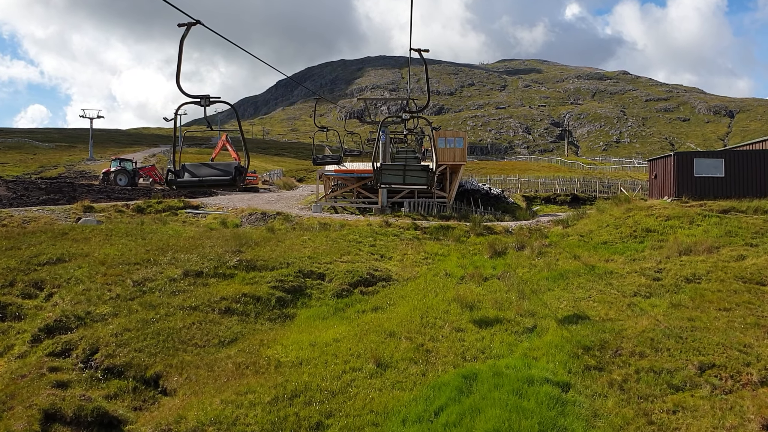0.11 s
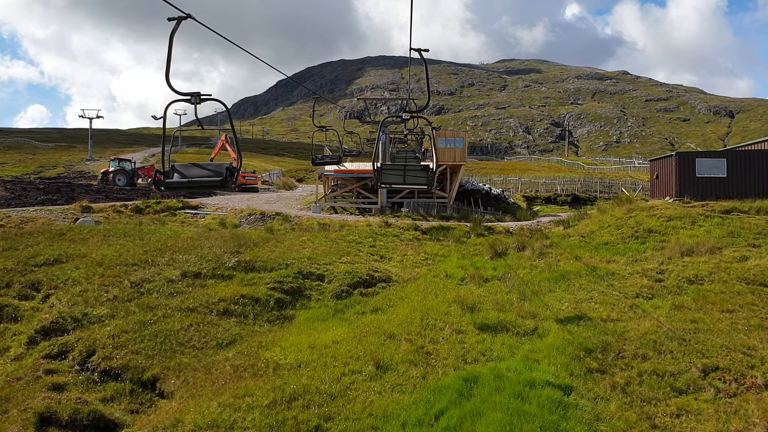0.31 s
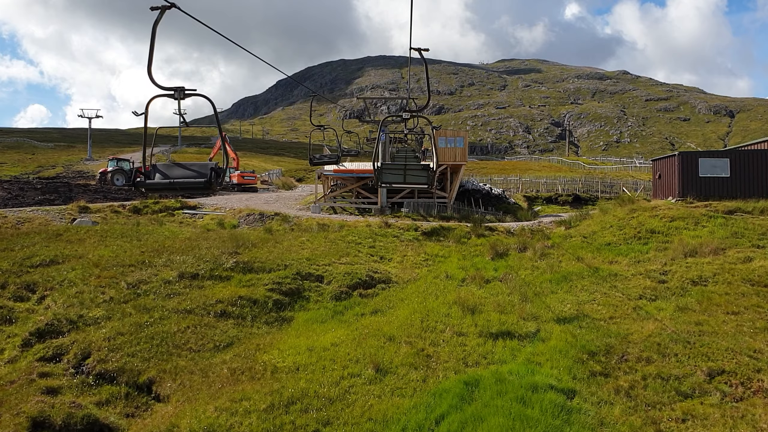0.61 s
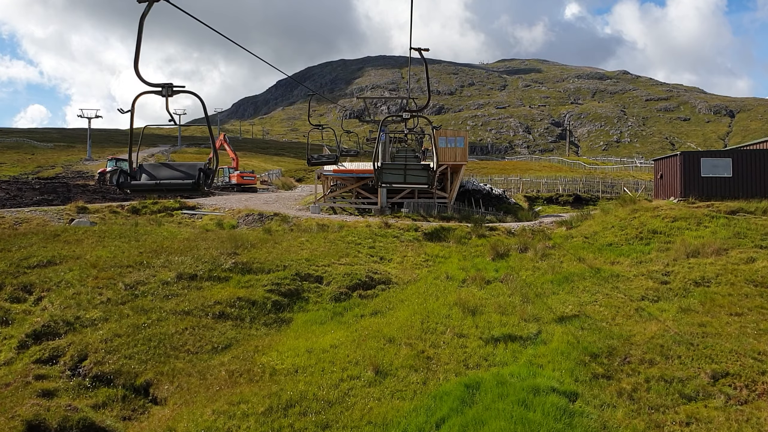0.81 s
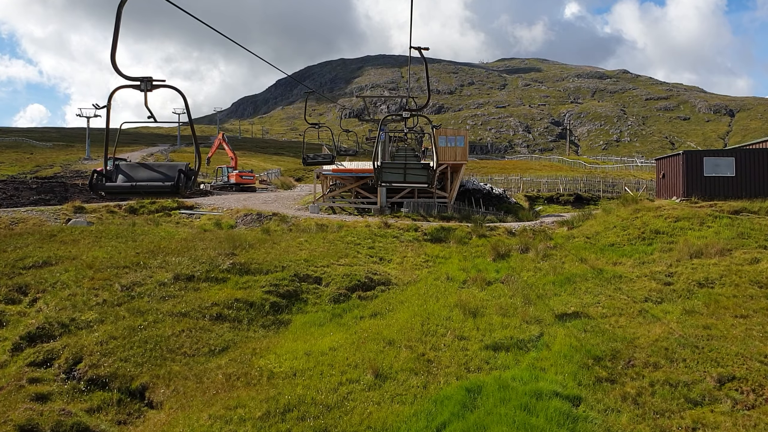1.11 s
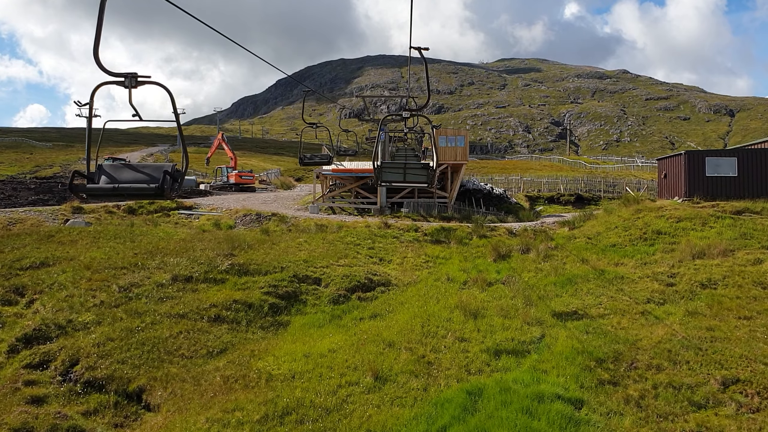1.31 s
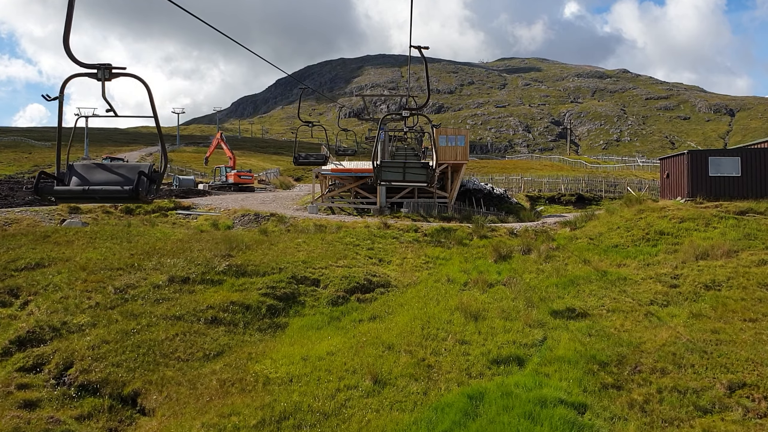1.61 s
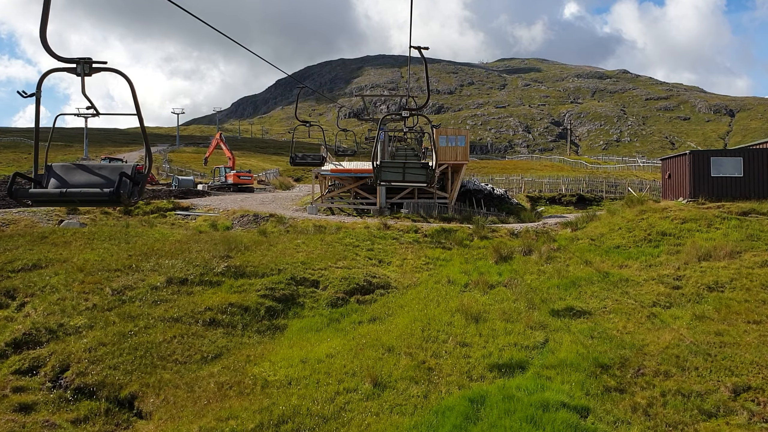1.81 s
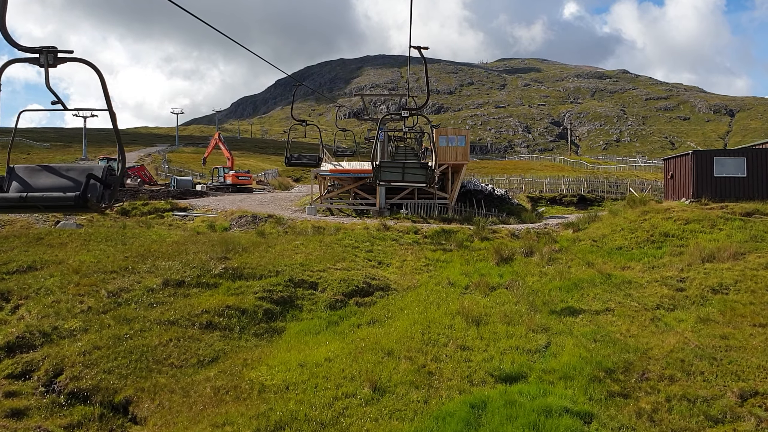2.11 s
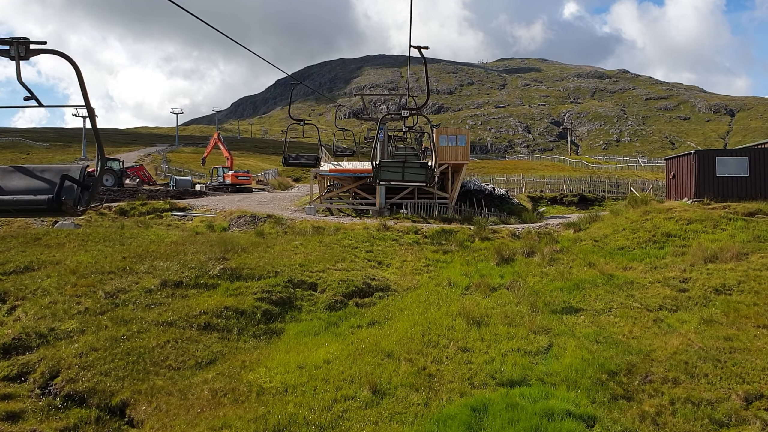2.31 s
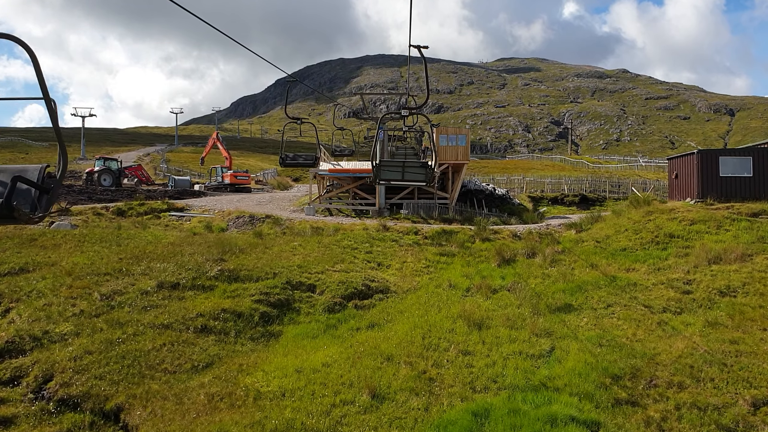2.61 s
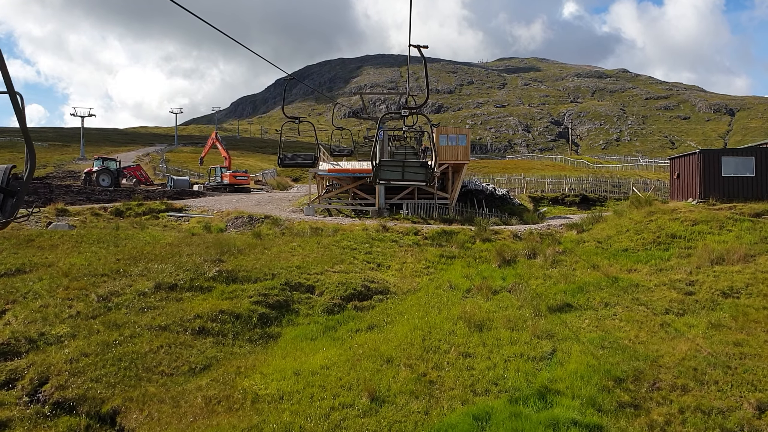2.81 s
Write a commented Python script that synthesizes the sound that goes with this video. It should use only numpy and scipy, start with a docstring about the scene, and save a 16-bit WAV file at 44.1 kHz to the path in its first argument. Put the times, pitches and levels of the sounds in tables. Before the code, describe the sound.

Wind gusts thump on the microphone over a distant diesel engine and faint chairlift hiss.

```python
"""Open hillside by a running chairlift. A distant diesel engine is a periodic source: its harmonics
make a steady low hum, and the knocks of its four cylinders a fast, uneven clatter. Friction of the haul
rope on its sheaves gives a slowly growing hiss, a faint singing and one brief scrape. Gusts strike the
microphone, nearly all on its right port; their turbulent pressure is heard as rumble and dull thumps,
with a faint, high rustle."""
import sys
import numpy as np
from scipy.fft import rfft, irfft, next_fast_len
from scipy.io import wavfile
from scipy.ndimage import map_coordinates

SR = 44100
rng = np.random.default_rng(int(sys.argv[2]) if len(sys.argv) > 2 else 0)


def int16_out(signal):
    """Quantize to a 16-bit WAV file."""
    q = np.round(np.clip(np.atleast_2d(signal).T, -1, 1) * 32767)
    wavfile.write(sys.argv[1], SR, q.astype(np.int16))


N = 130095
TIME = np.arange(N) / SR
FFT_SIZE = next_fast_len(N + 8192)
CYCLE_HZ = 15.17  # engine cycles a second
LEAD_S = 0.000093  # the left port hears the machinery first

# Harmonics of the engine (multiple of the cycle rate, left level [dB], right level [dB])
ENGINE_HARMONICS = [(3, -68, -59), (4, -58, -52), (6, -65, -57), (8, -56, -52), (14, -65, -60),
                    (18, -71, -67), (20, -72, -67), (21, -72, -66), (24, -70, -63), (28, -83, -73),
                    (36, -86, -77), (41, -83, -78), (49, -76, -74), (54, -76, -76), (59, -79, -75),
                    (72, -85, -78), (76, -87, -80), (105, -84, -83), (111, -90, -83), (123, -87, -84),
                    (158, -87, -87), (168, -89, -82), (172, -93, -86), (216, -96, -92)]
# Knocks of the four cylinders (place in the cycle [0-1], relative level [dB])
CYLINDER_KNOCKS = [(.08, -7), (.35, 0), (.555, -3), (.785, 1)]
# Part of the machinery's noise that comes in knocks (frequency [Hz], share of power [0-1])
KNOCK_SHARE = [(150, 0.14), (400, 0.47), (800, 0.63), (1800, 0.25), (3000, 0.1), (6000, 0.11), (10000, .03)]
# Likeness of that noise at the two ports (frequency [Hz], correlation [0-1])
PORT_CORRELATION = [(60, 0.93), (350, 0.96), (800, 0.76), (1500, 0), (2200, 0), (4200, 0.36), (7000, 0.1),
                    (10000, 0)]
# Its spectrum before the band gains (frequency [Hz], left density [dB/Hz], right density [dB/Hz])
MACHINERY_SPECTRUM = [(19.5, -89, -66), (38, -67, -67), (68.4, -66, -67.5), (122, -72, -68),
                      (224, -76, -75.5), (365, -85, -79.5), (467, -97, -91), (688, -92, -89),
                      (731, -82, -81.5), (910, -88, -86), (1116, -96, -87.5), (1273, -100, -100),
                      (1416, -99, -100), (1510, -91.5, -94), (1763, -100, -90.5), (1760, -92.5, -87),
                      (2193, -105, -102), (2470, -99, -92.5), (2570, -107, -94.5), (3080, -107, -106),
                      (3670, -111, -102), (3680, -112, -111), (4140, -111, -112), (4230, -111, -106),
                      (5050, -110, -110), (5700, -111, -110), (6700, -110, -108), (6850, -111, -114),
                      (7680, -112, -123), (8170, -121, -122), (9400, -122, -121), (11600, -118, -118),
                      (15500, -119, -119)]
# Gains of its two bands (time [s], clatter gain [dB], hiss gain [dB])
BAND_GAINS = [(0, -5, -2.5), (.45, -3.5, -2), (.62, -2.3, -1.8), (1, -2, 1), (1.35, -1, 0.5),
              (2.05, 0.5, -1.5), (2.4, 0, 3.1), (2.95, 2, 4)]
# Bands in which those gains act (frequency [Hz], weight [0-1])
CLATTER_WEIGHTS = [(300, 0.15), (900, 0.24), (2500, 0.85), (4500, 0)]
HISS_WEIGHTS = [(2500, 0), (4500, 0.83), (8000, 1), (11000, .1)]
# Resonances of the rope's singing and scrape (frequency [Hz], bandwidth [Hz], relative level [dB])
SINGING_MODES = [(5470, 55, -17.5), (6455, 190, -12)]
SCRAPE_MODES = [(4480, 140, -2), (1920, 510, 0)]
# Envelope of the singing on the right port (time [s], level [dB])
SINGING_ENVELOPE = [(0, -86), (.5, -83), (.7, -79), (1.05, -75), (1.45, -82), (1.9, -76), (2.5, -73),
                    (2.95, -76.5)]
# Spectrum of the wind's rumble (frequency [Hz], relative level [dB])
RUMBLE_SPECTRUM = [(15, -32.5), (35, 5), (62, 11), (100, -5), (200, -19.5), (400, -24), (900, -56),
                   (3000, -100)]
# Envelope of the rumble (time [s], left level [dB], right level [dB])
GUST_ENVELOPE = [(0, -66, -46), (.28, -79, -53), (.57, -60, -52), (.68, -62, -32.5), (.83, -56, -44),
                 (.93, -46, -29), (1.13, -64, -42.5), (1.27, -65, -33), (1.42, -53, -35), (1.48, -38, -42),
                 (1.57, -51, -39.5), (1.67, -49, -34), (1.85, -61, -58.5), (2.0, -61, -26),
                 (2.24, -63, -45), (2.37, -44, -29.5), (2.47, -50, -50), (2.95, -68, -86)]
# Eddies at the right port (time [s], envelope peak [dB], starting frequency [Hz], rise time [s])
EDDY_IMPACTS = [(0.609, -27, 139, 0.0037), (0.656, -24.5, 256, 0.0029), (0.715, -28, 60, 0.0099),
                (.9, -24.5, 70.4, .006), (0.926, -28, 79.5, 0.0038), (.988, -22.5, 182, 0.0025),
                (1.03, -29, 254, 0.005), (1.099, -27.5, 134, 0.0029), (1.184, -19, 210, 0.0049),
                (1.331, -20.5, 244, 0.014), (1.411, -22.5, 313, 0.0037), (1.66, -26, 228, 0.0033),
                (1.679, -22.5, 220, 0.0037), (1.748, -26.5, 98, 0.0039), (1.972, -16, 291, 0.0061),
                (2.007, -22.5, 180, 0.0081), (2.134, -20, 72, 0.0058), (2.234, -20.5, 235, 0.0021),
                (2.322, -23, 196, 0.0032)]
# Spectrum of the rustle (frequency [Hz], relative level [dB])
RUSTLE_SPECTRUM = [(3000, -30), (8000, -9), (12000, 0), (16000, -7)]
# Swells of the rustle (time [s], level [dB])
RUSTLE_SWELLS = [(.645, -81), (.99, -87), (1.35, -83), (2.0, -86)]


def amp(db):
    """Amplitude ratio: tenfold for every 20 dB."""
    return 10 ** (np.asarray(db) / 20)


def unit_rms(x):
    """Normalisation to unit mean power."""
    return x / np.sqrt(np.mean(x ** 2) + 1e-20)


def bell(offset, sigma):
    """Gaussian window of height 1."""
    return np.exp(-.5 * (offset / sigma) ** 2)


def at_hz(table, hz, column=1):
    """Interpolation of one column on a logarithmic frequency axis."""
    columns = np.transpose(table)
    return np.interp(np.log(hz + 1), np.log(columns[0] + 1), columns[column])


def envelopes(table):
    """Linear interpolation in time of each column after the first."""
    times, *columns = np.transpose(table)
    return np.array([np.interp(TIME, times, column) for column in columns])


def wobble(rate):
    """Slow random modulation: a spline through `rate` random values a second."""
    return map_coordinates(rng.standard_normal(512), [TIME * rate], mode="wrap")


def white_noise():
    """Flat-spectrum noise, uncorrelated between the two ports."""
    return rng.standard_normal((2, N))


def filtered(x, response):
    """Linear filtering: the spectrum is multiplied by a frequency response."""
    hz = np.fft.rfftfreq(FFT_SIZE, 1 / SR)
    return irfft(rfft(x, FFT_SIZE) * response(hz), FFT_SIZE)[..., :N]


def engine_cycles(wander=.0016):
    """Phase, in cycles, is the integral of the engine's slightly wandering speed."""
    return np.cumsum(CYCLE_HZ * (1 + wander * wobble(4))) / SR


def engine_hum(cycles, waver_db=3.0):
    """A periodic source radiates harmonics of its cycle rate; each wavers in level."""
    at_ports = cycles + CYCLE_HZ * np.array([[LEAD_S], [0]])
    out = np.zeros((2, N))
    for order, left_db, right_db in ENGINE_HARMONICS:
        phase = order * at_ports + rng.random()
        rms = amp([[left_db], [right_db]]) * amp(waver_db * wobble(5.19))
        out += rms * np.sqrt(2) * np.sin(2 * np.pi * phase)
    return out


def cylinder_knocks(cycles, width_cycles=.037, bed_db=-3.5, repeating_share=.66):
    """Amplitude modulation: each cylinder gates a burst of noise that partly repeats every cycle."""
    size = int(SR / CYCLE_HZ)
    one_cycle = unit_rms(irfft(np.exp(2j * np.pi * rng.random((2, size // 2 + 1))), size))
    repeating = np.array([map_coordinates(row, [cycles % 1 * size], mode="wrap") for row in one_cycle])
    noise = np.sqrt(repeating_share) * repeating + np.sqrt(1 - repeating_share) * white_noise()
    gate = amp(bed_db)
    for place, db in CYLINDER_KNOCKS:
        offset = (cycles - place + .5) % 1 - .5
        gate += amp(db) * bell(offset, width_cycles)
    return unit_rms(gate * noise)


def machinery_at_ports(pair):
    """Partial coherence: two noises mix into the ports, each port with its own colour and timing."""
    angle = lambda hz: np.arccos(at_hz(PORT_CORRELATION, hz)) / 2
    mid, side = filtered(pair, lambda hz: np.array([np.cos(angle(hz)), np.sin(angle(hz))]))
    colour = lambda hz, column: amp(at_hz(MACHINERY_SPECTRUM, hz, column))
    left = filtered(mid + side, lambda hz: colour(hz, 1) * np.exp(2j * np.pi * hz * LEAD_S))
    right = filtered(mid - side, lambda hz: colour(hz, 2))
    return np.sqrt(SR / 2) * np.array([left, right])


def clatter_and_hiss(cycles):
    """Incoherent sources add in power: engine knocks and the smooth rush of rope over sheaves."""
    knocks = filtered(cylinder_knocks(cycles), lambda hz: np.sqrt(at_hz(KNOCK_SHARE, hz)))
    rush = filtered(white_noise(), lambda hz: np.sqrt(1 - at_hz(KNOCK_SHARE, hz)))
    sound = machinery_at_ports(knocks + rush)
    clatter = filtered(sound, lambda hz: at_hz(CLATTER_WEIGHTS, hz))
    hiss = filtered(sound, lambda hz: at_hz(HISS_WEIGHTS, hz))
    clatter_db, hiss_db = envelopes(BAND_GAINS)
    hiss_db += 0.62 * wobble(10)
    return sound + (amp(clatter_db) - 1) * clatter + (amp(hiss_db) - 1) * hiss


def rope_resonance(modes, left_db=-17):
    """Forced resonance: friction noise drives narrow modes, heard mostly on the right port."""
    def response(hz):
        """Superposition of second-order resonances with steepened skirts."""
        total = 0
        for centre, width, db in modes:
            peak = 1j * hz * width / (centre ** 2 - hz ** 2 + 1j * hz * width)
            skirts = np.sqrt(1 + ((hz - centre) / (2 * width)) ** 2)
            total += amp(db) * peak / np.sqrt(width) / skirts
        return total
    return amp([[left_db], [0]]) * unit_rms(filtered(white_noise(), response))


def rope_singing(waver_db=1.2):
    """Sustained friction keeps two high resonances of the running rope sounding faintly."""
    level_db = envelopes(SINGING_ENVELOPE) + waver_db * wobble(7.9)
    return amp(level_db) * rope_resonance(SINGING_MODES)


def wind_rumble(flutter_db=5.5):
    """Turbulence makes low-frequency pressure fluctuations, uncorrelated between the ports."""
    noise = filtered(white_noise(), lambda hz: amp(at_hz(RUMBLE_SPECTRUM, hz)))
    flutter = amp(flutter_db * np.tanh([wobble(23), wobble(29.59)]))
    return amp(envelopes(GUST_ENVELOPE)) * unit_rms(noise * flutter)


def rope_scrape(centre_s=.8, sigma_s=.29, level_db=-74.5):
    """Friction excites two lower resonances of the rope in one soft swell."""
    return amp(level_db) * bell(TIME - centre_s, sigma_s) * rope_resonance(SCRAPE_MODES)


def eddy_thumps(final_hz=58.2, slowing_s=.0047, cutoff_hz=515):
    """Each eddy is a damped pressure oscillation on the right port that slows as it dies."""
    out = np.zeros((2, N))
    for onset_s, db, start_hz, rise_s in EDDY_IMPACTS:
        age = np.maximum(TIME - onset_s, 0)
        phase = final_hz * age + (start_hz - final_hz) * slowing_s * (1 - np.exp(-age / slowing_s))
        # A power below 1 steepens the front and lengthens the tail.
        envelope = (age / rise_s * np.exp(1 - age / rise_s)) ** .65
        out[1] += amp(db) * envelope * np.sin(2 * np.pi * phase)
    return filtered(out, lambda hz: 1 / np.sqrt(1 + (hz / cutoff_hz) ** 4))


def gust_rustle(sigma_s=.04):
    """Amplitude-modulated treble noise: a faint rustle swells briefly near four of the gusts."""
    swells = sum(amp(db) * bell(TIME - centre_s, sigma_s) for centre_s, db in RUSTLE_SWELLS)
    noise = filtered(white_noise(), lambda hz: amp(at_hz(RUSTLE_SPECTRUM, hz)))
    return swells * unit_rms(noise)


def scene():
    """Superposition: the pressures from the lift and the wind add at each port."""
    cycles = engine_cycles()
    lift = engine_hum(cycles) + clatter_and_hiss(cycles) + rope_singing()
    return lift + wind_rumble() + rope_scrape() + eddy_thumps() + gust_rustle()


def record(dry):
    """Band limiting: the microphone cuts the deepest bass and passes nothing above its upper limit."""
    low_cut_hz, top_hz = 30, 15750
    return filtered(dry, lambda hz: (hz < top_hz) * (1 - np.exp(-(hz / low_cut_hz) ** 6)))


dry = scene()
out = record(dry)
int16_out(out)
```